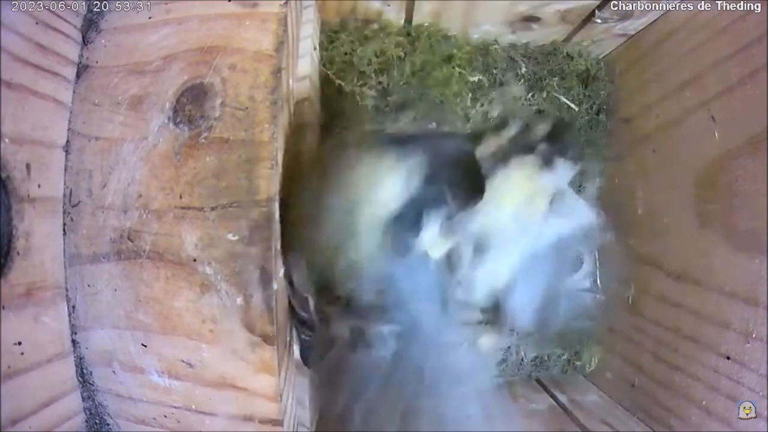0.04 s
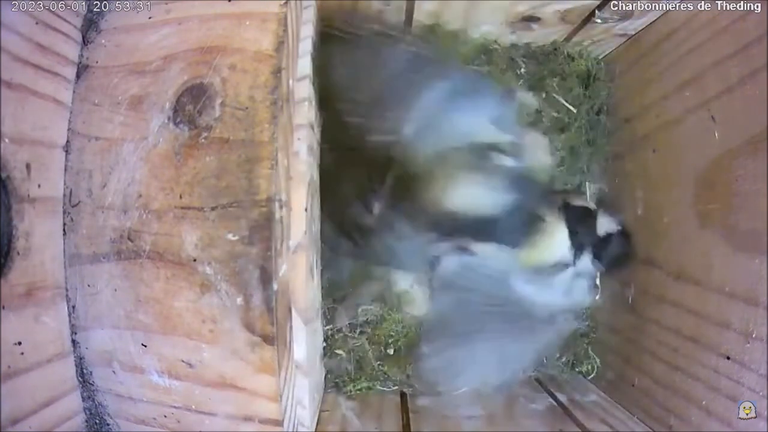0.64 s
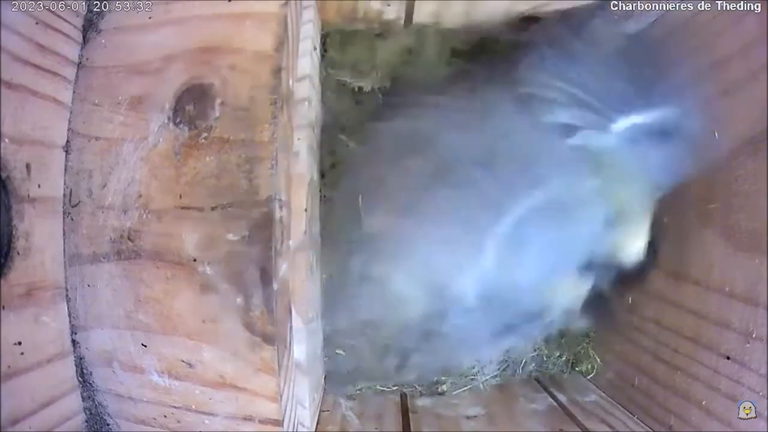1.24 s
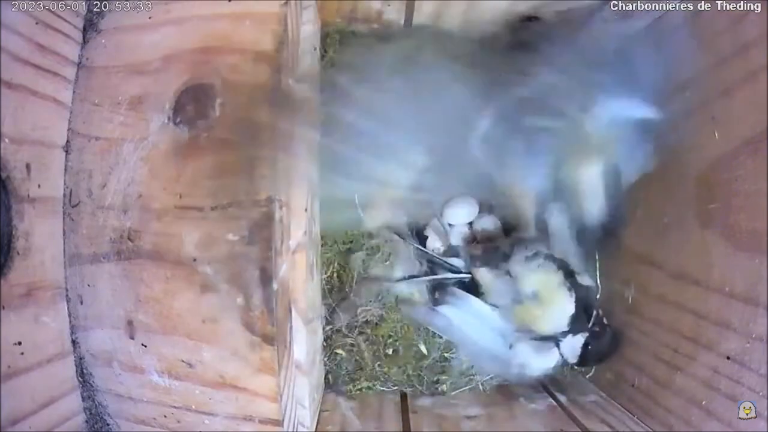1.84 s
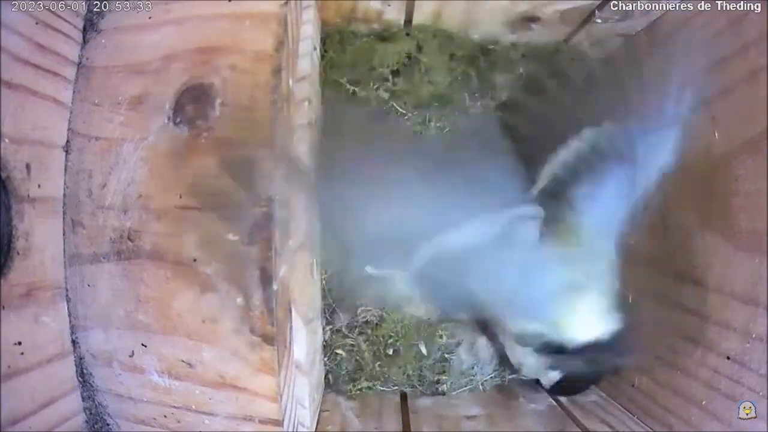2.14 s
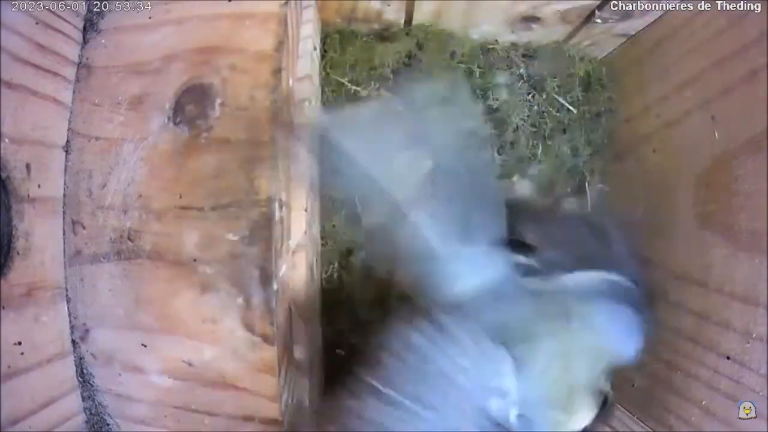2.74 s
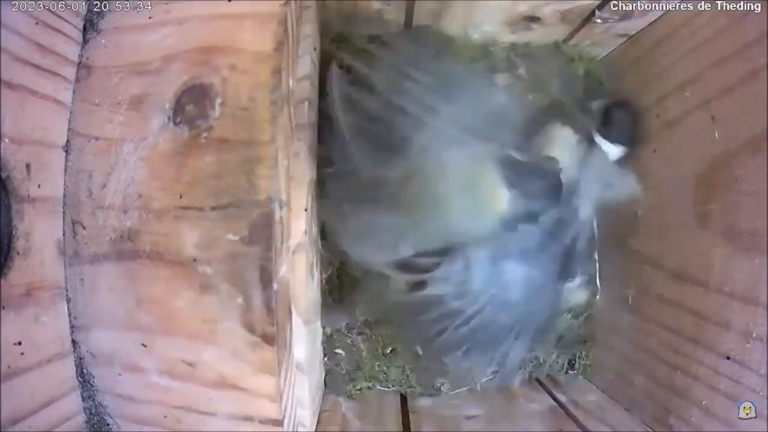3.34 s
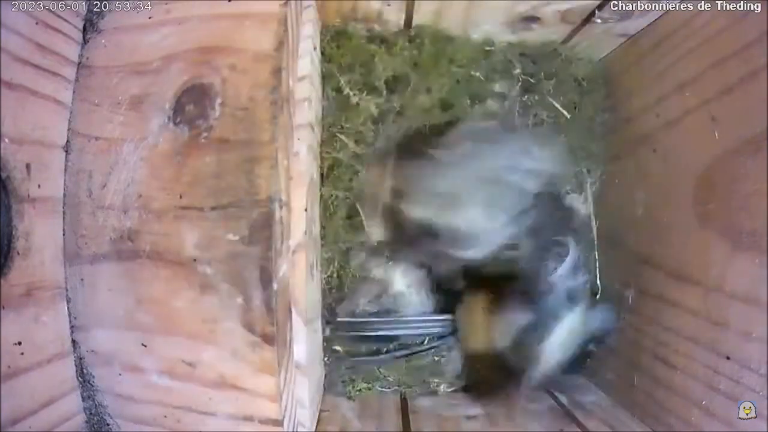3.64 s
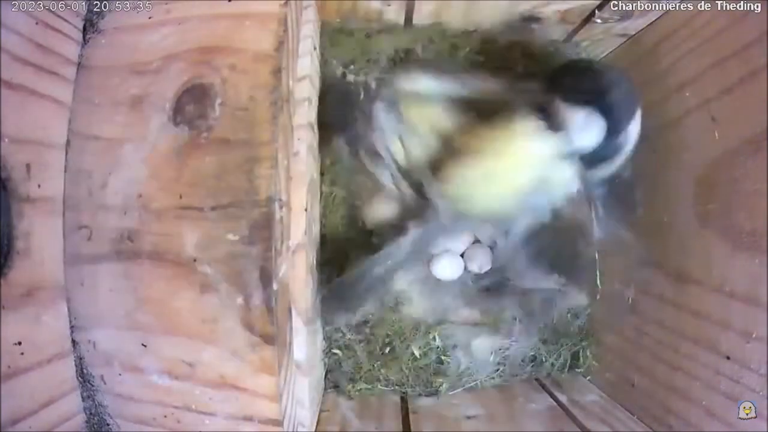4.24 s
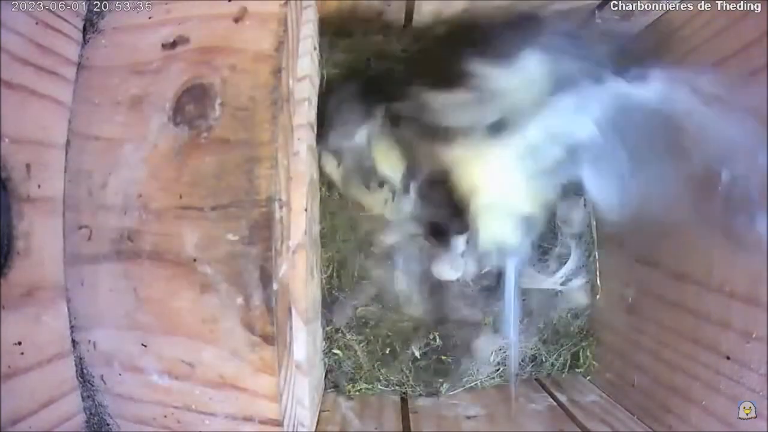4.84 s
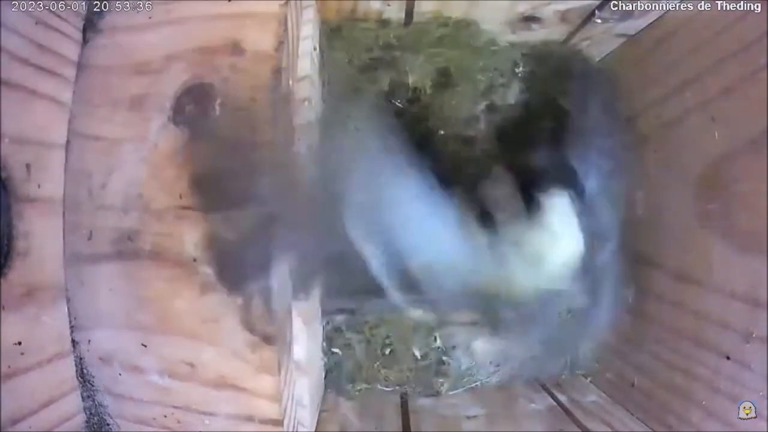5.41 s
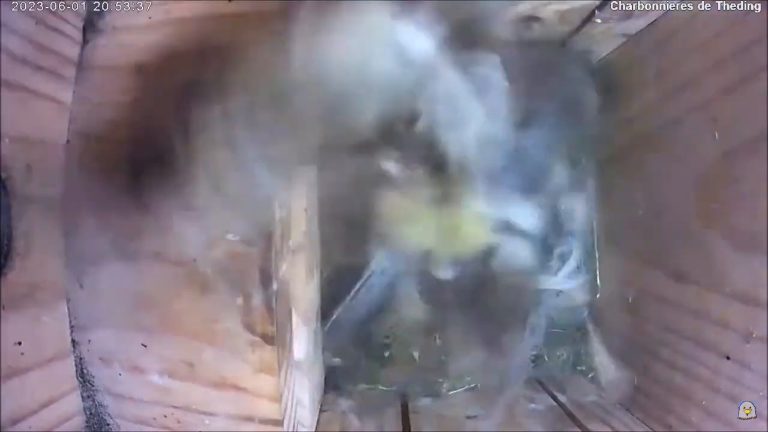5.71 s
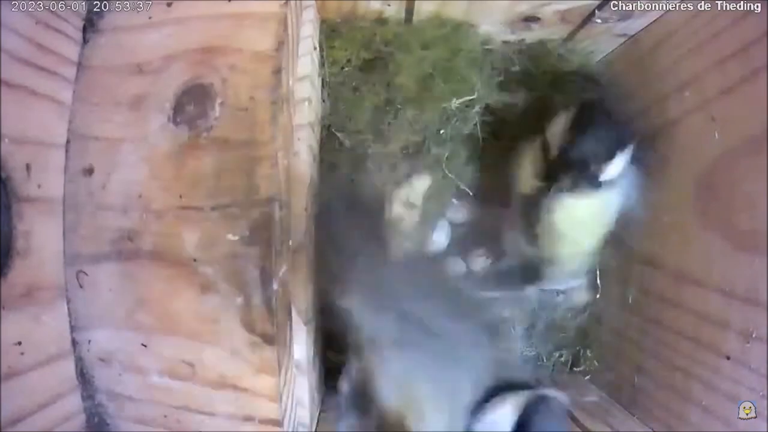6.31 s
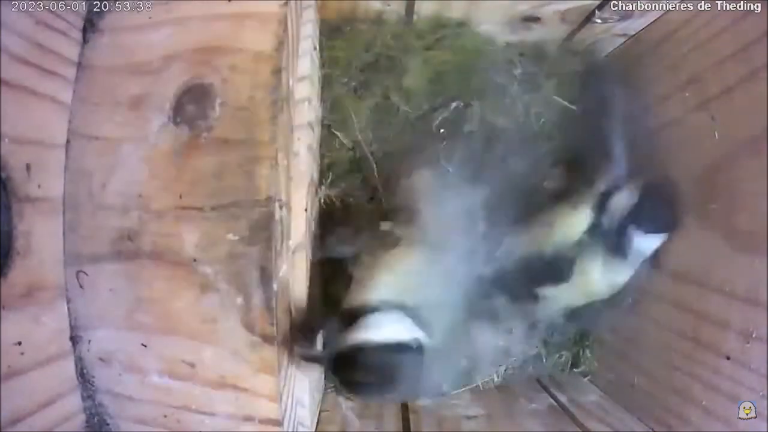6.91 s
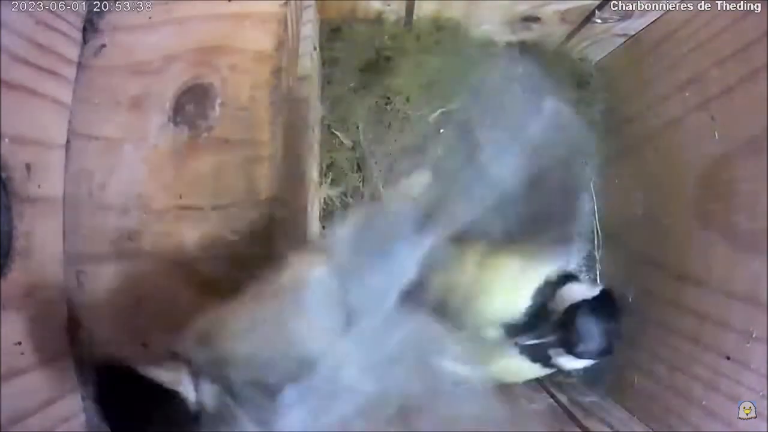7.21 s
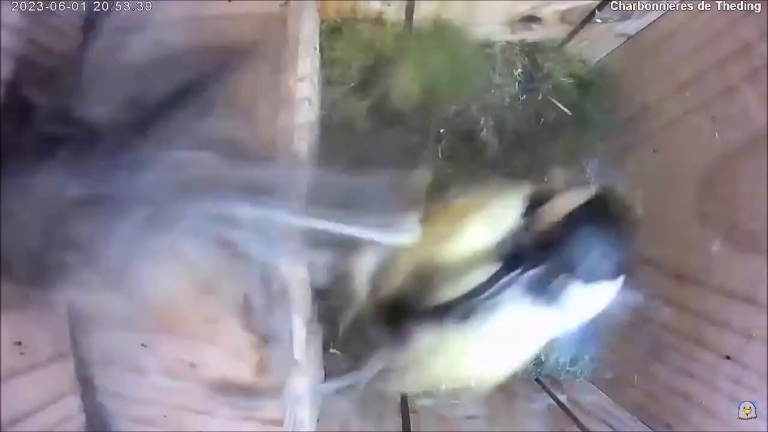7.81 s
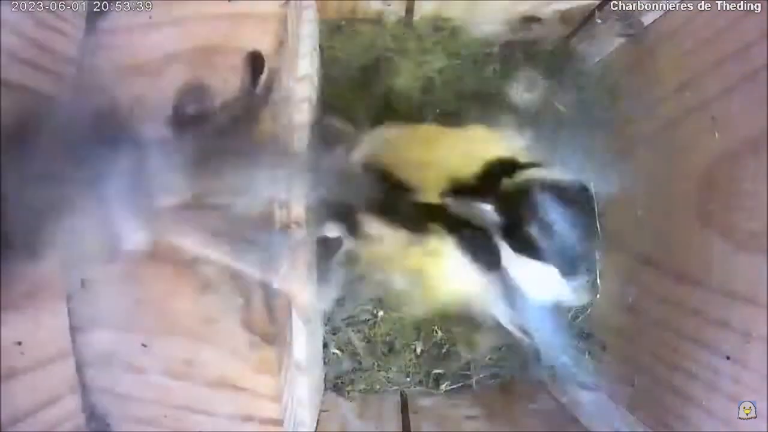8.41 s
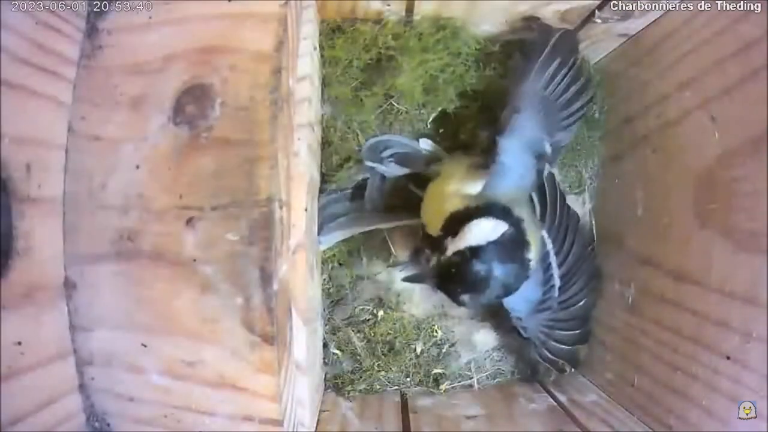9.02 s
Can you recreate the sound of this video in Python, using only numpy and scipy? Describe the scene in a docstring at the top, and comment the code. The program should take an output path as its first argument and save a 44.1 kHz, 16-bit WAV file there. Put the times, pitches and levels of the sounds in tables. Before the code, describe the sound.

Two small birds fight inside a wooden nest box, heard from a microphone just above them. From the start they scream in short, arched whistles, shrill, rasping and sometimes two-toned, about four or five a second. Under the calls, moss rustles in uneven bouts, wings beat, and feet and bodies knock hollowly on the boards, with stronger flurries around 1 and 3 seconds. From about 4.4 to 5.2 seconds there is a lull, with only a few tiny squeaks and lighter bumps. Then the calls return shorter and quicker, and the thumps become much harder, heaviest from 5.5 to 7 seconds. Around 8 seconds wing tips scrape the wood and the last calls sound. A few weaker knocks follow, and by about 8.7 seconds only a faint steady hiss remains. The sound is narrow and telephone-like, overloading slightly at the loudest moments.

```python
"""Inside a wooden nest box, a small camera's microphone right above two fighting great tits.
From the start the moss rustles over a faint hiss, and wings, feet and bodies thump the boards.
The birds scream at once: short arched whistles, two-voiced and rasping. After a lull near 5 s
the calls come shorter and the blows harder; around 8 s wing tips scrape the wood and the fight fades.
The camera passes only a telephone-like band and overloads on the loudest moments."""
import sys
import numpy as np
from scipy import signal
from scipy.fft import rfft, irfft, next_fast_len
from scipy.io import wavfile
from scipy.ndimage import uniform_filter1d

SR = 44100
rng = np.random.default_rng(int(sys.argv[2]) if len(sys.argv) > 2 else 0)


def inscribe(sig):
    """Save sig as 16-bit PCM at rate SR to the path in sys.argv[1].

    A 1-D sig is mono; a 2-D sig holds one channel per row.
    Samples are clipped to [-1, 1] before scaling.
    """
    pcm = np.round(np.clip(np.atleast_2d(sig).T, -1, 1) * 32767)
    wavfile.write(sys.argv[1], SR, pcm.astype(np.int16))


N = 399546
TIME = np.arange(N) / SR


def from_db(db):
    """Decibels to gain."""
    return 10 ** (np.asarray(db) / 20)


def rms_one(x):
    """Scaled to rms 1."""
    return x / np.sqrt(np.mean(x ** 2) + 1e-20)


def in_time(rows):
    """Rows of time_s and a value, joined by straight lines."""
    return np.interp(TIME, *np.transpose(rows))


def butter(x, hz, kind, order=2):
    """Causal Butterworth filter."""
    return signal.sosfilt(signal.butter(order, hz, kind, fs=SR, output="sos"), x)


def resonance(x, hz, width_hz):
    """Two-pole resonance, gain 1 on top."""
    r = np.exp(-np.pi * width_hz / SR)
    poles = [1, -2 * r * np.cos(2 * np.pi * hz / SR), r * r]
    return signal.lfilter(np.array([1, 0, -1]) * (1 - r * r) / 2, poles, x)


def noise(spectrum):
    """Noise of a given colour, rms 1."""
    hz, db = np.transpose(spectrum)
    size = next_fast_len(N)
    bins = np.maximum(np.arange(size // 2 + 1) * SR / size, 1)
    gain = from_db(np.interp(np.log(bins), np.log(hz), db)) * (bins < 2 * hz[-1])
    return rms_one(irfft(rfft(rng.standard_normal(size)) * gain, size)[:N])


def phase_of(hz):
    """Running phase of a gliding tone."""
    return 2 * np.pi * np.cumsum(hz) / SR


def flutter(hz):
    """Irregular oscillation about a rate, rms 1."""
    return rms_one(butter(rng.standard_normal(N), [hz / np.sqrt(2), hz * np.sqrt(2)], "band"))


def pulsing(hz, wander=.2):
    """A vibration whose rate is unsteady, rms 1."""
    return np.sqrt(2) * np.sin(phase_of(hz * (1 + wander * flutter(44.5))))


# Noise floor in the box: frequency_hz, density_db
HISS_SPECTRUM = [(15, -42.5), (25, -16.5), (70, -8), (145, 4), (307, -7.5), (597, -10), (3940, -17),
                 (4200, -22.5), (5460, -44), (9240, -120)]

def hiss(level_db=-57.5):
    """A faint, steady hiss under the whole fight."""
    return from_db(level_db) * noise(HISS_SPECTRUM)


# Bouts of struggling on the nest floor: start_s, peak_s, peak_db
STRUGGLE_BOUTS = [(.0, .4, -29.5), (.7, .8, -28), (.92, 1.22, -24.5), (1.76, 1.8, -26.5),
                  (2.08, 2.15, -33.5), (2.58, 2.63, -38), (2.8, 3.05, -26), (3.2, 3.36, -19),
                  (3.82, 3.88, -34.5), (3.98, 4.1, -42), (4.27, 4.38, -37.5), (4.777, 4.88, -29.5),
                  (5.286, 5.339, -22.5), (5.46, 5.58, -14.5), (5.74, 5.94, -17), (6.25, 6.438, -28),
                  (6.5, 6.74, -15.5), (6.85, 7.02, -15), (7.15, 7.3, -28.5), (7.53, 7.6, -17),
                  (7.78, 7.88, -18), (8.0, 8.26, -21.5), (8.37, 8.45, -33)]

def struggle(t, build_db=8.5, onset_db_per_s=452.5, dying_db_per_s=168):
    """Vigour of the fight in dB: each bout starts quickly, builds to its peak and dies away."""
    bouts = [db - build_db * np.clip((peak - t) / (peak - start), 0, 1)
             - onset_db_per_s * np.maximum(start - t, 0)
             - dying_db_per_s * np.maximum(t - peak, 0)
             for start, peak, db in STRUGGLE_BOUTS]
    return np.max(bouts, axis=0)


# Moss stirred just below the microphone: frequency_hz, density_db
MOSS_SPECTRUM = [(25, -40), (55, -26), (100, -6), (170, 8.5), (300, -17.5), (460, -10.5), (800, -24.5),
                 (1030, -18), (1400, -27.5), (4000, -43)]

def moss_rustle(level_db=2.5):
    """Feathers and claws drag through the moss in uneven strokes: a soft rustle with no deep bass."""
    strokes = rms_one(from_db(4 * flutter(38) + 2.5 * flutter(130)))
    vigour_db = np.interp(TIME, TIME[::100], struggle(TIME[::100]))
    return butter(from_db(vigour_db + level_db) * strokes * noise(MOSS_SPECTRUM), 95, "high", order=3)


def wing_beats(beats_per_s=16, spread_db=7.5, cutoff_hz=500):
    """Light, uneven beats while the birds struggle; rows like those of HEAVY_BLOWS."""
    timing, thud_scatter, knock_scatter = rng.standard_normal((200, 3)).T
    starts = (np.arange(len(timing)) + .25 * timing) / beats_per_s
    vigour_db = struggle(starts)
    thud_db = vigour_db - 6.5 + spread_db * thud_scatter
    knock_db = vigour_db - 16 + spread_db * knock_scatter
    rows = np.transpose([starts, thud_db, knock_db, np.full(len(starts), cutoff_hz)])
    return rows[(vigour_db > -45) & (starts < N / SR)]


# Wings, feet and bodies hitting the boards: start_s, thud_db, knock_db, cutoff_hz (higher is harder)
HEAVY_BLOWS = [(.038, -27.5, -63, 560), (.127, -23.5, -27, 1510), (.301, -23.5, -33, 1140),
               (.394, -18.5, -24.5, 380), (.574, -23.5, -25.5, 490), (.727, -26, -30, 380),
               (.78, -7, -29.5, 380), (.919, -20, -38, 380), (.944, -24.5, -21, 380),
               (1.131, -10.5, -23.5, 930), (1.211, -12.5, -25, 520), (1.295, -16, -18.5, 930),
               (2.101, -12, -24, 680), (2.646, -31, -29, 660), (2.992, -30, -20.5, 950),
               (3.039, -13, -13.5, 690), (3.175, -12.5, -19, 640), (3.313, -13.5, -15, 550),
               (3.354, -14.5, -19, 760), (3.418, -7, -22, 380), (3.88, -21, -28.5, 930),
               (3.986, -14.5, -75, 380), (4.035, -21.5, -30, 790), (4.152, -22.5, -35, 940),
               (4.394, -27.5, -35.5, 610), (4.466, -44, -25, 760), (4.784, -25.5, -33, 480),
               (4.888, -27, -32, 610), (4.963, -25, -17.5, 640), (5.306, -9.5, -9.5, 480),
               (5.486, -12, -22, 580), (5.534, 0, -2, 580), (5.823, -6.5, -28.5, 520), (5.896, -4, -8, 600),
               (5.91, -2.5, -31, 480), (5.948, 0, -46, 410), (5.975, -9, -17, 460),
               (6.062, -24.5, -23.5, 380), (6.23, -16, -34.5, 1160), (6.377, -5, -23.5, 690),
               (6.496, -12, -24, 850), (6.553, -2.5, -8.5, 780), (6.576, 0, -21, 550),
               (6.617, -4, -17.5, 430), (6.677, -12.5, -19.5, 510), (6.731, 5, -13, 510),
               (6.758, -1.5, -15, 600), (6.791, -6, -25.5, 780), (6.832, -9.5, -15.5, 710),
               (6.987, -0.5, -4, 430), (7.011, -11.5, -23, 690), (7.06, -13.5, -30, 790),
               (7.193, -18, -53, 560), (7.349, -16.5, -42.5, 380), (7.578, -5, -20, 440),
               (7.629, -13.5, -43, 770), (7.777, -8.5, -22, 1170), (7.818, -21, -22.5, 1040),
               (7.892, -38, -21, 1580), (7.944, -14, -20, 1400), (7.992, -8, -22.5, 770),
               (8.085, -42, -23.5, 700), (8.151, -13, -19.5, 750), (8.202, -1.5, -20.5, 530),
               (8.245, -6.5, -20, 500), (8.318, -12, -23.5, 1580), (8.378, -18.5, -19.5, 1400),
               (8.44, -12.5, -28, 1300), (8.459, -16.5, -24.5, 1190), (8.543, -31, -66.5, 720),
               (8.602, -24, -72, 500)]
# Modes of the wooden box around the microphone: frequency_hz, width_hz, gain_db
WOOD_MODES = [(127.8, 23, 2), (178.8, 47.3, 4.5), (264, 8, -11), (449, 22, 3.5), (538, 98, -0.5),
              (719, 78, -7), (997.7, 57, 9), (1230, 40, 0), (1541, 67, -11.5), (2180, 59, -18),
              (2740, 90, -17), (3480, 660, -13.5)]

def blows(thud_trim_db=-1, push_s=.0051, tap_s=.0011, brush_s=.0044, split_hz=360):
    """A soft push of wing or body drives the low modes; brushing feathers, then a tap, the high ones."""
    t = TIME[:SR // 6]
    late = np.maximum(t - .005, 0)  # the tap follows the first touch
    contact = late / tap_s * np.exp(-late / tap_s) + .53 * t / brush_s * np.exp(-t / brush_s)
    out = np.zeros(N + len(t))
    for start, thud_db, knock_db, cutoff_hz in [*HEAVY_BLOWS, *wing_beats()]:
        grain = rng.standard_normal((2, len(t)))
        push = butter(grain[0] * t / push_s * np.exp(-t / push_s), [80, 420], "band")
        tap = butter(grain[1] * contact, cutoff_hz, "low", order=3)
        tap = butter(tap, 330, "high")
        thud = sum(from_db(db) * resonance(push, hz, bw) for hz, bw, db in WOOD_MODES if hz < split_hz)
        knock = sum(from_db(db) * resonance(tap, hz, bw) for hz, bw, db in WOOD_MODES if hz >= split_hz)
        at = max(round(start * SR), 0)
        for ring, db in ((thud, thud_db + thud_trim_db), (knock, knock_db)):
            out[at:at + len(t)] += from_db(db) * ring / np.std(ring[:SR // 44])
    return out[:N]


def call_pitch(since, length, opening_hz, top_hz, closing_hz, rise_share):
    """Pitch of a call: a sweep that eases into a hold, then a late bend, usually down."""
    progress, rise_share = np.clip(since / length, 0, 1), np.clip(rise_share, .02, .98)
    sweep = np.sin(np.pi / 2 * np.minimum(progress / rise_share, 1))
    bend = (np.maximum(progress - rise_share, 0) / (1 - rise_share)) ** 3.9
    return opening_hz + (top_hz - opening_hz) * sweep + (closing_hz - top_hz) * bend


def call_effort(since, length, loudest_share, edge_s, attack_s=.019, release_s=.027):
    """Gate of a call, the swell and taper of its tone, and the steady fade of its rasp."""
    progress = np.clip(since / length, 0, 1)
    pace = min(length / .045, 1)  # the shortest calls open and close faster, down to a snap
    opening = np.clip((since / pace + edge_s) / attack_s, 0, 1)
    closing = np.clip(((length - since) / pace + edge_s) / release_s, 0, 1)
    swell_db = np.interp(progress, [0, loudest_share, 1], [-17, 0, -9])
    fade_db = -5 * progress
    return opening * closing, swell_db, fade_db


# Hoarseness, tilting the rasp towards its low band: time_s, tilt_db
RASP_TILT = [(0.5, -7.5), (1.86, -8.5), (2.4, 8.5), (3.02, -8.5), (3.86, -12), (4.5, -12.5), (5.47, -2),
             (5.6, 0), (6.55, -5), (6.9, -7), (7.74, 11), (8.1, -4.5)]
# Low and high bands of the rasping breath: frequency_hz, density_db
LOW_BREATH = [(650, -35.5), (900, -23), (1050, -4.5), (1220, -6.5), (1400, -9), (1680, -1), (1900, 5),
              (2020, -7.5), (2200, 4), (2520, -15.5), (2900, -22)]
HIGH_BREATH = [(2400, -30.5), (2620, -14.5), (2820, -0.5), (3000, -3), (3210, -11.5), (3420, 7.5),
               (3700, 6), (4050, -4), (4400, -15), (5000, -36)]

def rasping_breath(buzz, stutter):
    """The vibration chops the air stream into puffs; returns the rasp and its hoarseness, 0 to 1."""
    tilt = from_db(in_time(RASP_TILT))
    balance = 1 / np.sqrt(1 + tilt ** 2)
    breath = (noise(HIGH_BREATH) + tilt * from_db(-10) * noise(LOW_BREATH)) * balance
    chop = rms_one(from_db(4.5 * buzz) * stutter)
    return 2 * np.tanh(breath * chop / 2), tilt * balance  # the rasp stays even, without sharp spikes


# Trembling of both voices: time_s, swing_hz
VOICE_TREMBLE = [(2.6, 26), (3.0, 71.3), (3.65, 60), (4.2, 46), (5.4, 21.4), (6.0, 93), (7.5, 30)]
# Stretches where the voice period doubles: start_s, end_s, half_pitch_db
PERIOD_DOUBLINGS = [(0.205, 0.256, -29), (1.37, 1.397, -15.5), (5.244, 5.35, -18), (7.223, 7.294, -9),
                    (7.681, 7.77, -6)]
# Screams at point-blank range:
# start_s, length_s, opening_hz, top_hz, closing_hz, rise_share, loudest_share, tone_db, rasp_db
CALLS = [(0.058, 0.22, 3620.0, 3242, 3116, 0.15, 0.47, -7.5, -17.5),
         (0.263, 0.079, 3110, 3077, 3000, 0.1, 0.13, -18, -21.5),
         (0.435, 0.2, 2450.0, 3552, 3320, 0.25, 0.44, -4.5, -24.5),
         (0.75, 0.1, 3070.0, 2763, 3030, 0.45, 0.99, -15, -24.5),
         (0.966, 0.14, 1670, 3260, 3080, 0.89, 0.98, -9, -19),
         (1.198, 0.21, 2079, 3432, 2890, 0.68, 0.37, -12.5, -17.5),
         (1.508, 0.18, 1270.0, 3650, 3690, 0.35, 0.29, -11, -21),
         (1.759, 0.22, 2370.0, 3612, 3460, 0.27, 0.48, -1, -18),
         (2.043, 0.15, 2450.0, 3660.0, 3370, 0.4, 0.51, -6, -20),
         (2.293, 0.19, 1782, 3493, 3070, 0.37, 0.35, -9.5, -23.5),
         (2.561, 0.14, 1403, 3224, 3470, 0.37, 0.92, -10, -22),
         (2.75, 0.14, 1246, 2260, 1354, 0.3, 0.2, -12.0, -22),
         (2.955, 0.12, 1238, 3040, 2890, 0.52, 0.84, -8, -16.5),
         (3.157, 0.07, 1262, 3100.0, 1200, 0.54, 0.38, -8, -13),
         (3.279, 0.1, 1263, 3348, 3740, 0.7, 0.75, -4, -14),
         (3.443, 0.11, 2050.0, 3060, 2650, 0.85, 0.95, -9, -14.5),
         (3.612, 0.11, 1847, 3140, 2590, 0.93, 0.86, -9, -24),
         (3.799, 0.13, 2180, 3437, 2560, 0.63, 0.45, -9, -19.5),
         (4.008, 0.16, 2157, 3100, 2520, 0.64, 0.32, -8, -19.5),
         (4.246, 0.11, 2710.0, 3175, 3300, 0.5, 0.1, -19.5, -19),
         (4.38, 0.028, 3700, 3610.0, 2380, 0.4, 0.13, -40, -15.5),
         (4.567, 0.0077, 4380, 3940, 2900, 0.43, 0.43, -12.5, -14.5),
         (4.838, 0.011, 3823, 3810, 2720.0, 0.15, 0.29, -24, -24),
         (5.239, 0.11, 3195, 3930, 2890, 0.38, 0.89, -6, -28),
         (5.437, 0.079, 2960.0, 3760.0, 2720, 0.37, 0.05, -7, -11),
         (5.529, 0.079, 1392, 2634, 2010.0, 0.87, 0.28, -14, -18),
         (5.641, 0.1, 2063, 2930, 2360, 0.4, 0.45, -17, -19),
         (5.753, 0.082, 2055, 2950, 2200.0, 0.43, 0.58, -13.5, -20),
         (5.883, 0.071, 1340, 2984, 2520, 0.59, 0.69, -13, -16.5),
         (5.995, 0.11, 1236, 3000, 2640, 0.79, 0.34, -16.5, -27.5),
         (6.117, 0.064, 2360, 2204, 2100, 0.38, 0.56, -14.5, -21),
         (6.237, 0.081, 1213, 2343, 1980.0, 0.67, 0.55, -11, -20.5),
         (6.357, 0.08, 1260, 3697, 3720.0, 1, 0.54, -7, -12.5),
         (6.503, 0.081, 2042, 2924, 2450, 0.48, 0.53, -8.5, -16),
         (6.611, 0.074, 1250.0, 3166, 2970, 1, 0.57, -10, -23),
         (6.795, 0.067, 1897, 3380.0, 2900, 0.92, 0.79, -10, -14.5),
         (6.934, 0.067, 1267, 3862, 3660, 0.93, 0.73, -5.5, -9),
         (7.113, 0.061, 1373, 3700, 3180, 0.73, 0.17, -23.5, -23),
         (7.21, 0.08, 2013, 3700, 3300.0, 0.77, 0.98, -15.5, -24.5),
         (7.378, 0.037, 2910, 3890, 3720.0, 0.27, 0.32, -39.5, -29.5),
         (7.495, 0.055, 2158, 3600, 3800.0, 0.83, 0.25, -22.5, -18.5),
         (7.613, 0.045, 1485, 3880, 4140, 0.68, 0.21, -26, -20.5),
         (7.683, 0.091, 3560, 3547, 2550, 0.49, 0.86, -13, -28),
         (7.878, 0.063, 1924, 3425, 3100.0, 0.97, 0.45, -11, -15.5),
         (7.991, 0.058, 2474, 2985, 3450, 0.96, 0.35, -11.5, -17),
         (8.135, 0.042, 2246, 3570, 3170.0, 0.89, 0.32, -9.5, -13.5)]

def screams(edge_s=.005, jitter_hz=105, sideband_hz=230, taut_hz=3000, throat_hz=3590):
    """The syrinx whistles, and shakes the more, the stronger its rasp or the slacker its pitch."""
    warble, jitter, buzz, fast_buzz = pulsing(110), flutter(330), pulsing(270), pulsing(540, .1)
    wander, stutter, lurch = flutter(9), from_db(2.4 * flutter(60)), flutter(70)
    waver, kinks = from_db(2 * flutter(34)), 80 * flutter(32)
    shimmer = waver * from_db(3 * buzz) * stutter ** 2
    rasp, hoarseness = rasping_breath(buzz, stutter)
    doubling = sum(from_db(db) * ((TIME > start) & (TIME < end)) for start, end, db in PERIOD_DOUBLINGS)
    doubling = uniform_filter1d(doubling, size=300)
    tremble = in_time(VOICE_TREMBLE) * warble
    voice, growl = np.zeros(N), np.zeros(N)
    for start, length, *arch, loudest_share, tone_db, rasp_db in CALLS:
        at = np.flatnonzero((TIME > start - edge_s) & (TIME < start + length + edge_s))
        since = TIME[at] - start
        pitch = call_pitch(since, length, *arch)
        gate, swell_db, fade_db = call_effort(since, length, loudest_share, edge_s)
        tone_db, rasp_db = tone_db + swell_db, rasp_db + fade_db
        slack = np.clip((taut_hz - pitch) / 980, 0, 1)
        rough = np.maximum(1 / np.sqrt(1 + from_db(tone_db - rasp_db + 4.5) ** 2), .7 * slack)
        smooth_phase = phase_of(pitch + tremble[at] + rough * kinks[at])
        # a fast buzz splits the rough whistle into stacked partials
        shake = jitter_hz * (jitter[at] + lurch[at]) / np.sqrt(2) + sideband_hz * fast_buzz[at]
        phase = smooth_phase + phase_of(rough * shake)
        # the throat lifts the octave while the pitch is low
        octave = np.exp(-((2 * pitch - throat_hz) / 800) ** 2) * np.sin(phase + smooth_phase)
        whistle = from_db(-2 * slack) * np.sin(phase) + doubling[at] * np.sin(phase / 2) + octave
        whistle *= rms_one(shimmer[at] ** rough)
        voice[at] += gate * (from_db(tone_db) * np.sqrt(2) * whistle + from_db(rasp_db) * gate * rasp[at])
        # a slower vibration rides on the whistle: its own line and a sideband below the pitch
        growl_hz = np.maximum(pitch, 2800) * (.39 + .04 * wander[at]) + rough * jitter_hz * buzz[at]
        growl_phase = phase_of(growl_hz)
        growl_lines = .63 * np.sin(growl_phase) + .79 * np.sin(phase - growl_phase)
        growl[at] += gate ** 3 * from_db(rasp_db - 3) * growl_lines
    growl = butter(growl * hoarseness * stutter, 1000, "high", order=4)
    return voice + growl + second_voice(tremble + kinks / 2)


# Glides sung within the screams: start_s, length_s, opening_hz, closing_hz, level_db
GLIDES = [(0.057, .19, 3700, 3680, -9), (0.253, 0.075, 4040, 3820, -12.5),
          (0.779, 0.056, 3290, 3830, -15.5), (1.027, 0.065, 3387, 3800, -13.5),
          (1.262, .042, 2900, 3350, -13), (1.346, 0.022, 3442, 3454, -8.5), (2.578, 0.071, 3770, 4020, -20),
          (2.66, 0.015, 3110, 3110, -10.5), (2.815, 0.069, 3720, 3650, -17.5),
          (2.955, 0.039, 3520, 3660, -10.5), (3.018, 0.027, 2830, 4000, -12),
          (3.178, 0.036, 3720, 3373, -14), (3.279, 0.021, 3030, 4016, -8), (3.318, 0.05, 2680, 2465, -16.5),
          (3.477, 0.033, 3371, 3880, -11), (3.631, 0.056, 3250, 3760, -17), (3.82, 0.042, 2800, 3700, -15),
          (4.055, 0.051, 3715, 3870, -10), (5.245, 0.024, 3557, 3720, -13.5),
          (5.453, 0.062, 1950, 2270, -19.5), (5.639, 0.045, 2700, 3830, -25.5),
          (5.763, 0.029, 2640, 3710, -22), (6.002, 0.038, 2800, 4050, -24.5),
          (6.242, 0.063, 3178, 3678, -18), (6.356, 0.036, 2900, 3900, -21.5),
          (6.508, 0.021, 2590, 3750, -24), (6.647, 0.016, 2690, 3730, -12), (6.795, 0.029, 2740, 3910, -30),
          (7.887, 0.04, 2870, 4170, -12.5)]

def second_voice(tremble):
    """The other side of the syrinx adds short swelling glides, trembling in step with the first."""
    shake, shimmer = tremble + 70 * flutter(250), from_db(1.5 * flutter(340))
    out = np.zeros(N)
    for start, length, opening_hz, closing_hz, db in GLIDES:
        at = np.flatnonzero((TIME > start) & (TIME < start + length))
        progress = (TIME[at] - start) / length
        pitch = opening_hz + (closing_hz - opening_hz) * progress
        swell = np.sqrt(2 * np.abs(np.sin(np.pi * progress)))
        out[at] += from_db(db) * swell * shimmer[at] * np.sin(phase_of(pitch + shake[at]))
    return out


# Wing tips and claws sweeping the bare boards close by: start_s, length_s, level_db
SWEEPS = [(1.118, 0.042, -24.5), (6.665, 0.035, -17), (7.767, 0.047, -17.5), (7.938, 0.031, -10),
          (8.179, 0.048, -14), (8.241, 0.036, -18), (8.289, 0.086, -27)]
# Feather on wood: frequency_hz, density_db
SWEEP_SPECTRUM = [(400, -22.5), (1000, -2.5), (1400, -2.5), (1800, -6), (2700, -9.5), (3100, -2.5),
                  (4200, -24.5)]

def scrapes(trim_db=-4.5, flick_hz=170):
    """Feather after feather flicks past the wood."""
    swell = sum(from_db(db) * np.sin(np.pi * np.clip((TIME - start) / length, 0, 1))
                for start, length, db in SWEEPS)
    return from_db(trim_db) * swell * noise(SWEEP_SPECTRUM) * rms_one(from_db(.65 * pulsing(flick_hz)))


# Standing waves of the air around the microphone: frequency_hz, gain_db
STANDING_WAVES = [(1000, 2), (1190, 1.5), (1560, 5.5), (1700, 8), (1890, 0), (2180, 4.5), (2350, -12.5),
                  (2780, 2.5), (3210, -12.5)]

def box_air(x, ring_db=-3, width_hz=42):
    """Close walls leave a few standing waves that ring on briefly."""
    return x + sum(from_db(ring_db + db) * resonance(x, hz, width_hz) for hz, db in STANDING_WAVES)


def scene():
    """The fight as it reaches the one microphone inside the box."""
    birds = box_air(screams() + scrapes() + moss_rustle())
    return (birds + hiss() + blows())[None]


def record(dry, camera_rate_hz=8000, band_hz=4230, mirror_db=-13, ceiling=.93):
    """The camera's low sample rate mirrors the highest tones; its band ends steeply, and peaks clip."""
    mirror = 2 * np.cos(2 * np.pi * camera_rate_hz * TIME) * butter(dry, 6200, "low", order=8)
    band = signal.firwin(201, band_hz, fs=SR, window=("kaiser", 8))
    narrow = signal.fftconvolve(dry + from_db(mirror_db) * mirror, band[None], mode="same")
    treble_cut = signal.ellip(10, .1, 80, 16000, fs=SR, output="sos")
    return signal.sosfilt(treble_cut, np.clip(narrow, -ceiling, ceiling))


dry = scene()
out = record(dry)
inscribe(out)
```